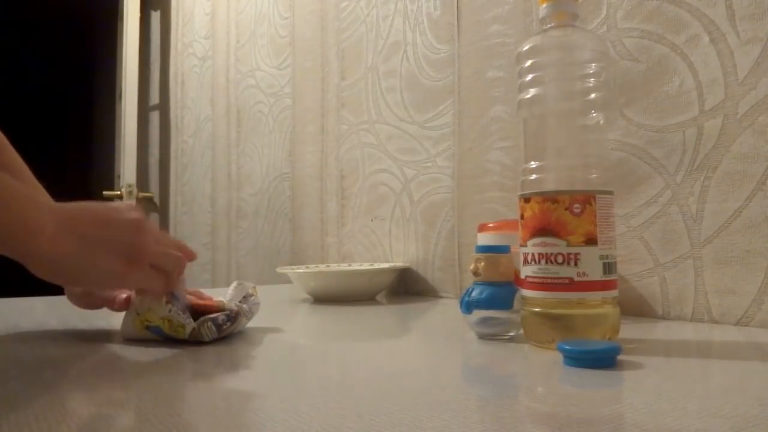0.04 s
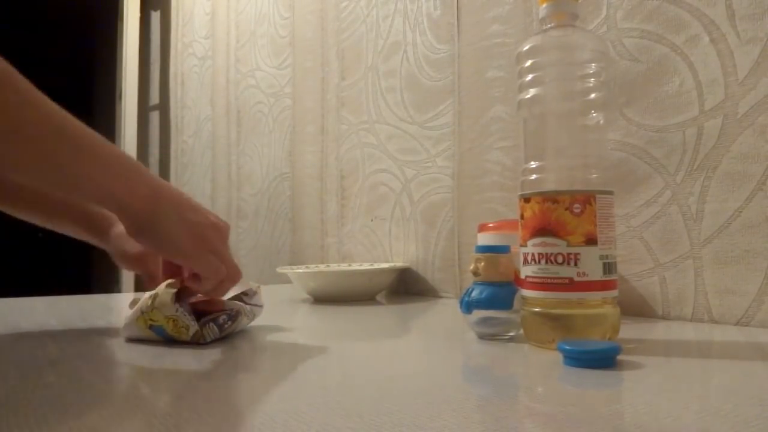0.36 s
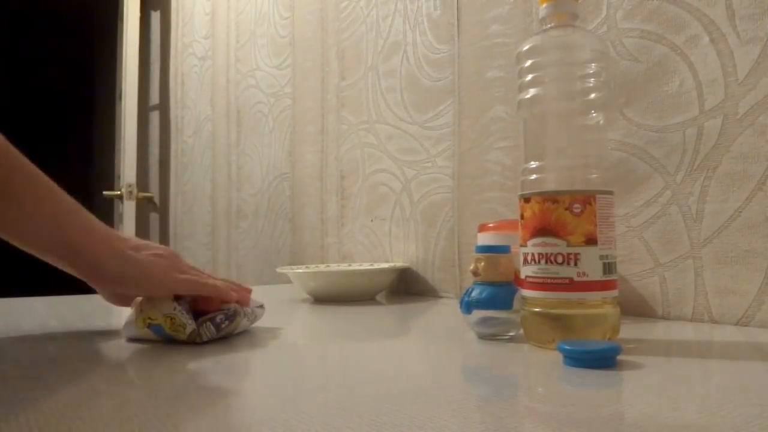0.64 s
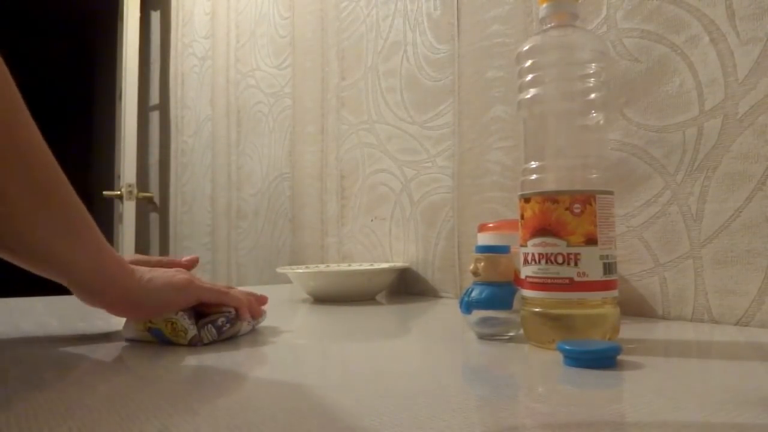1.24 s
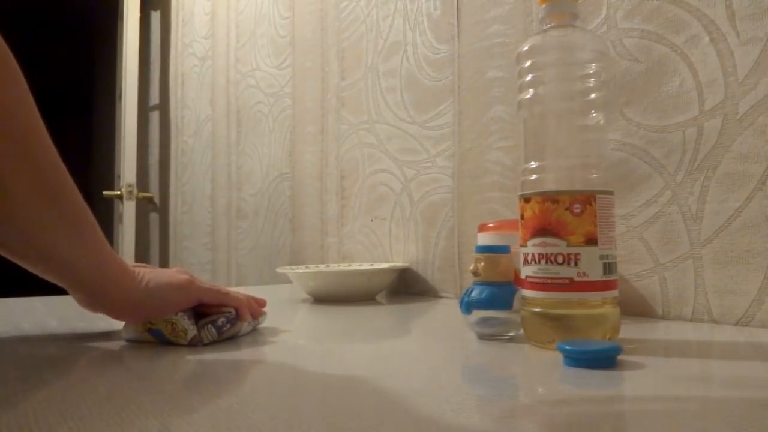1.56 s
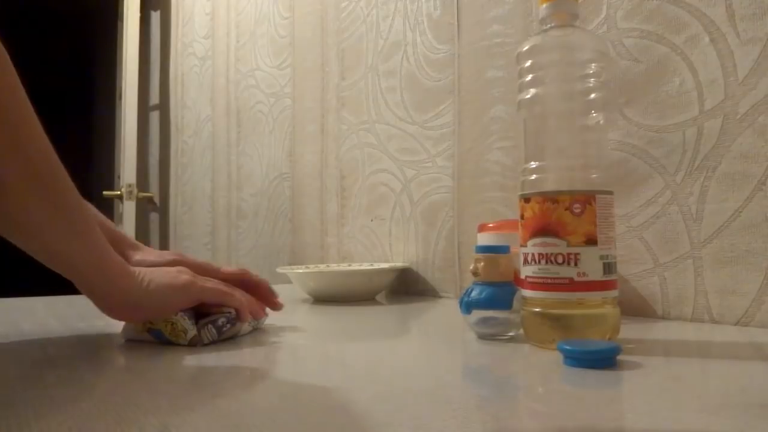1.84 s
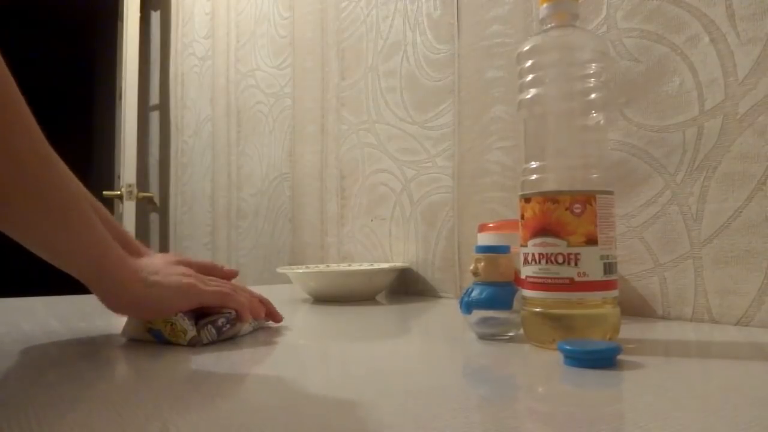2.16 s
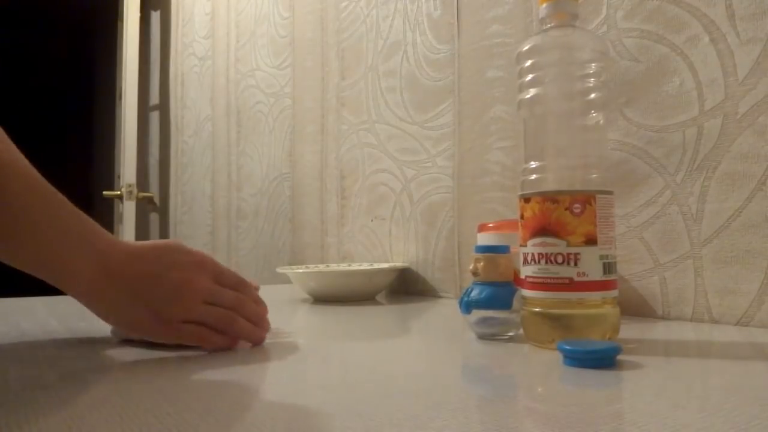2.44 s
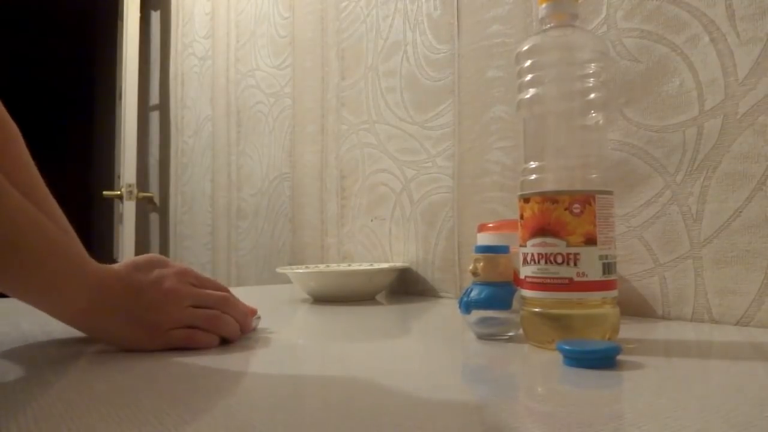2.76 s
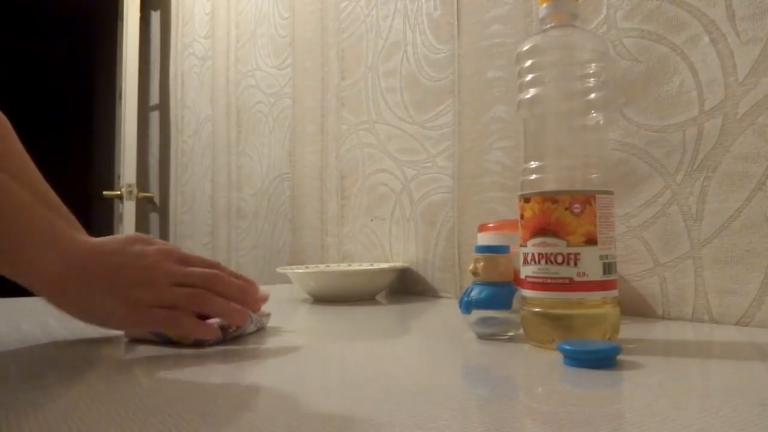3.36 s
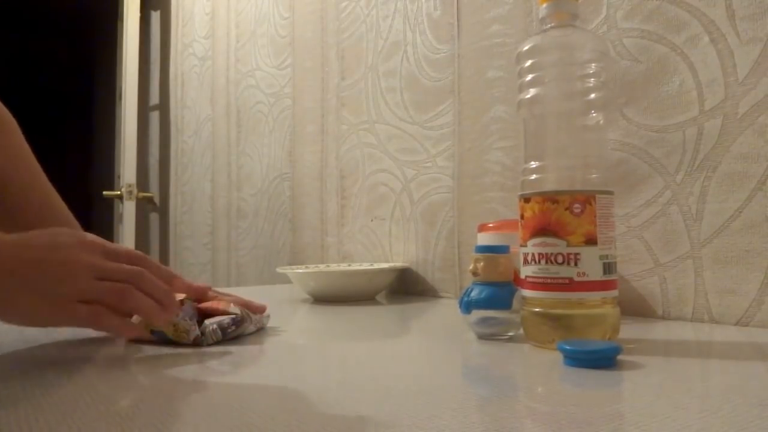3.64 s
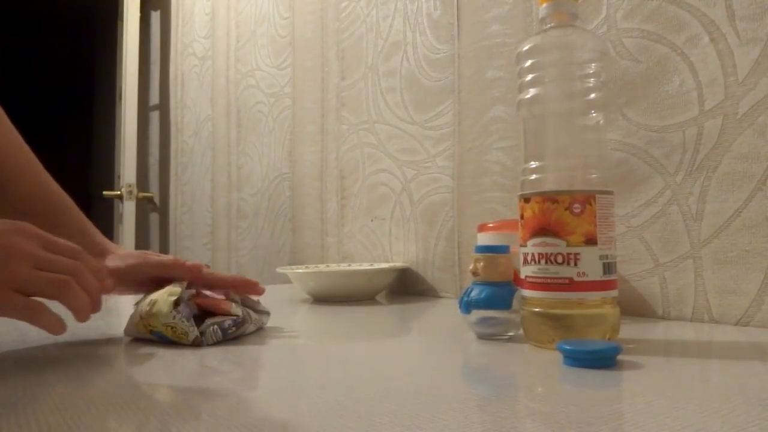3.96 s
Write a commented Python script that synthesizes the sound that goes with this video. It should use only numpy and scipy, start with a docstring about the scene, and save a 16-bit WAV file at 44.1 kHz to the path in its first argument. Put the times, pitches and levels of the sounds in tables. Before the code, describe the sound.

A paper bundle crinkles in a small room, with sharp, bright snaps over a fine rustle. Hands press it down, bumping the table lightly, and the sound turns duller, ending in a soft rub of skin on paper.

```python
"""In a small room, hands fold a stiff paper bundle shut, press it flat on a table and let it go.
Creases buckle with sharp snaps over fine crackle and sliding paper, bright at first, duller near the end.
Low puffs sit under some bright snaps, paper edges skid, hard pushes knock the table, and at last
the palm slides away. The table and wall reflect each snap, and the room rings briefly."""
import sys
import numpy as np
from scipy import signal
from scipy.fft import rfft, irfft
from scipy.io import wavfile
from scipy.ndimage import uniform_filter1d

SR = 44100
rng = np.random.default_rng(int(sys.argv[2]) if len(sys.argv) > 2 else 0)


def master(y):
    """Save y as 16-bit WAV."""
    cut = np.clip(np.atleast_2d(y).T, -1, 1)
    pcm = np.round(cut * 32767)  # scale
    wavfile.write(sys.argv[1], SR, pcm.astype(np.int16))


N = 176400
HZ = np.fft.rfftfreq(4096, 1 / SR)  # the frequencies at which filters are drawn

# how strong the rustle is in three ranges: t/s, low level/dB, middle level/dB, treble level/dB
RUSTLE_LEVELS = [(0, -37.5, -38, -29), (.13, -43, -29.5, -20.5), (.19, -40.5, -40, -29),
                 (0.298, -41.5, -41.5, -28), (0.382, -34.5, -26.5, -22), (.435, -47, -40, -40),
                 (0.485, -57, -31, -26.5), (.61, -36.5, -30, -26), (.74, -46.5, -48.5, -38.5),
                 (0.773, -41.5, -38, -26.5), (0.818, -46, -39.5, -34), (0.879, -39, -33, -25.5),
                 (1.1, -41.5, -28.5, -29), (1.218, -36, -34, -33.5), (1.31, -48, -40, -41.5),
                 (1.39, -34, -34, -34), (1.49, -53, -44, -38), (1.536, -32.5, -30, -36),
                 (1.573, -47, -43, -42), (1.645, -37.5, -36.5, -32.5), (1.82, -42, -39, -36),
                 (1.878, -46.5, -39, -38.5), (2.048, -45, -43.5, -41.5), (2.109, -34.5, -34.5, -39),
                 (2.274, -43.5, -33.5, -28.5), (2.33, -63, -37.5, -37.5), (2.411, -70, -37.5, -31),
                 (2.461, -92, -58, -49), (2.497, -76, -47, -49), (2.514, -55, -32, -27),
                 (2.675, -41.5, -39.5, -36), (2.733, -28.5, -26.5, -28.5), (2.775, -41.5, -49, -40),
                 (2.86, -52.5, -49.5, -44.5), (2.929, -46.5, -43, -35), (2.99, -55, -47, -57),
                 (3.139, -44, -41, -47), (3.195, -47, -28.5, -40.5), (3.325, -44, -41, -41),
                 (3.37, -38, -35, -40), (3.494, -38.5, -40, -48), (3.66, -64.5, -50, -55),
                 (3.75, -51, -45.5, -49), (3.99, -50.5, -41, -50)]
# tone colour of each range: f/Hz, level/dB
LOW_COLOUR = [(30, -36), (230, -20.5), (300, -9.5), (480, -6), (720, 2.5), (1100, 3), (1600, -25.5),
              (4000, -36)]
MIDDLE_COLOUR = [(300, -42), (800, -11), (1150, -1), (1600, -5), (2150, 2), (4000, -10), (16000, -49)]
TREBLE_COLOUR = [(1000, -20.5), (2600, -6), (3500, 0), (4400, 4), (5500, 1.5), (7500, -2.5), (11500, -8.5),
                 (16000, -13.5)]
# texture of each range: crackle rate/(1/s), size spread/dB, amount of sliding, clumping/dB, gain/dB
RUSTLE_TEXTURE = [(818, 3.5, 0.6, 2.5, -3.5), (602, 2.5, 0.98, 3.5, -2), (600, 2.8, 0.9, 3, -3.5)]
# colour of the room's steady noise: f/Hz, level/dB
ROOM_COLOUR = [(120, -16), (2500, -15.5), (16000, -46)]
# reflections from table and wall: left delay/s, right delay/s, gain
REFLECTIONS = [(.00068, 0.00052, 0.1), (.0029, .0033, 0.16)]
# how long the room takes to fade by 60 dB: f/Hz, fade time/s
ROOM_FADE = [(100, 0.15), (270, 0.51), (700, 0.25), (4000, 0.2), (16000, 0.27)]
# creases that buckle: t/s, ring f/Hz, ring level/dB, thud level/dB, crack level/dB
CREASE_SNAPS = [(0.0792, 7800, -29, -38, -20), (0.096, 4400, -7.5, -39, -14), (0.098, 4440, -6.5, -42, -24),
                (0.1489, 4260, -13.5, -21.5, -24), (0.2051, 4960, -12.5, -42, -13),
                (0.3591, 5400, -17.5, -23, -23), (0.4448, 4560, -12.5, -44, -11),
                (0.4822, 5170, -8.5, -28, -13), (0.559, 4200, -12, -28, -20),
                (0.5857, 11900, -14, -36, -17), (0.6786, 11230, -22, -46, -23.5),
                (0.9188, 2750, -15.5, -48, -27), (0.9546, 4870, -11.5, -43, -17),
                (0.9784, 4570, -37, -37, -19.5), (1.0011, 4460, -8.5, -21, -17.5),
                (1.0445, 4600, -9.5, -19.5, -13), (1.113, 2930, -16.5, -21, -24),
                (1.139, 4480, -14, -38, -22), (1.1934, 4240, -12, -21, -23),
                (1.2411, 4980, -7.5, -34, -12.5), (1.2496, 5130, -18, -32, -18.5),
                (1.342, 4160, -16, -23.5, -25.5), (1.3806, 4100, -17, -24, -28.5),
                (1.4392, 4140, -15.5, -23.5, -40), (1.5855, 4140, -13, -21.5, -25.5),
                (1.6338, 1460, -21.5, -28, -24.5), (1.6933, 4160, -12.5, -23, -24),
                (1.737, 2120, -10.5, -20, -19), (1.8033, 5170, -14.5, -29.5, -16.5),
                (1.9021, 4180, -16, -25, -27.5), (1.9637, 3800, -15.5, -25, -27.5),
                (2.0708, 4130, -12.5, -25, -25), (2.0827, 4200, -15.5, -21, -26.5),
                (2.1299, 4240, -16, -25, -41), (2.2781, 4200, -13, -23, -26), (2.4215, 1796, -31, -56, -31),
                (2.6661, 5940, -17.5, -52, -22.5), (2.6932, 4300, -14.5, -19.5, -24),
                (2.7245, 2720, -17, -38, -37), (2.7351, 4060, -15, -22, -35),
                (2.9358, 4600, -22, -32.5, -30.5), (3.0172, 3600, -20.5, -30, -29),
                (3.1795, 2620, -19.5, -25.5, -51), (3.274, 2370, -22.5, -54, -30),
                (3.3424, 2030, -12, -22.5, -43), (3.5081, 2430, -17.5, -29, -31.5)]
# colours of a snap's thud and of its crisp crack: f/Hz, level/dB
THUD_COLOUR = [(200, -29.5), (550, -3.5), (850, 11), (1250, 18), (1900, -28.5), (5000, -32.5)]
CRACK_COLOUR = [(400, -13), (3000, -28), (6000, -1.5), (7800, 14), (10000, 7.5), (11500, 8.5), (16000, -5)]
# low puffs under the brightest snaps: t/s, level/dB
LOW_PUFFS = [(0.091, -52), (.203, -51), (.444, -45), (0.484, -47), (.586, -53), (0.773, -49), (0.979, -46),
             (1.735, -58), (1.803, -49)]
# paper edges that skid: t/s, length/s, f/Hz, level/dB
EDGE_SKIDS = [(.207, 0.052, 4840, -31), (0.446, 0.034, 8460, -28), (1.241, 0.018, 6860, -22.5),
              (1.802, 0.027, 7200, -27), (2.421, 0.017, 1730, -28), (3.277, 0.033, 9000, -46.5),
              (3.51, 0.041, 2350, -31.5)]
# the hardest pushes on the table: t/s, level/dB
HARD_PUSHES = [(1.048, -41.5), (1.634, -41.5), (1.738, -41.5), (2.085, -45), (2.727, -36)]
# colour of the palm's knocking and sliding: f/Hz, level/dB
PALM_COLOUR = [(60, -25), (330, -5.5), (520, 4), (900, -7.5), (3000, -49)]
# skin sliding over the flat bundle: t/s, level/dB
PALM_LEVELS = [(3.04, -59), (3.17, -50), (3.298, -57), (3.36, -41.5), (3.499, -56.5), (3.6, -86)]

USUAL_RING_HZ = 3940  # patches of paper that ring lower than this count as large


def amp(db):
    """Turns decibels into a gain."""
    return 10 ** (np.asarray(db) / 20)


def unit(x):
    """Scales a sound to a total energy of one."""
    return x / np.sqrt(np.sum(x ** 2) + 1e-20)


def even(x):
    """Scales a sound to an average power of one."""
    return unit(x) * np.sqrt(x.size)


def read(points, hz=HZ):
    """Reads between the rows of a table, with frequency spaced like musical pitch."""
    f, value = np.transpose(points)
    return np.interp(np.log(hz + 1), np.log(f + 1), value)


def add(mix, s, sound):
    """Mixes a sound in, starting at s seconds."""
    part = mix[max(round(s * SR), 0):][:len(sound)]
    part += sound[:len(part)]


def fade(t, seconds):
    """A smooth decay that loses 60 dB in the given time."""
    return np.exp(-np.log(1000) * t / seconds)


def colour(x, db):
    """Filters a sound by one gain in dB for each frequency in HZ."""
    log_gain = np.log(amp(np.r_[db, db[-2:0:-1]]))
    response = np.exp(np.conj(signal.hilbert(log_gain)))  # rings after a click, never before
    taps = irfft(response[:len(HZ)])
    return signal.oaconvolve(x, taps[:len(HZ)])[:len(x)]


def flatten(force, width_hz=350):
    """Evens out the lows and highs of a burst, ready to be coloured."""
    power = abs(rfft(force, 2 * len(HZ) - 2)) ** 2
    smoothed = uniform_filter1d(power, int(width_hz / HZ[1]))
    return colour(force, -10 * np.log10(smoothed + 1e-9))


def rustle(clump_s=.008):
    """Paper slides on paper: a smooth hiss and tiny crackles, both coming in clumps."""
    t, out = np.arange(N) / SR, np.zeros(N)
    times, *levels = np.transpose(RUSTLE_LEVELS)
    for level, shape, texture in zip(levels, (LOW_COLOUR, MIDDLE_COLOUR, TREBLE_COLOUR), RUSTLE_TEXTURE):
        per_s, spread_db, sliding, clump_db, gain_db = texture
        sizes = amp(spread_db * np.minimum(rng.exponential(1, N), 4.8)) * rng.choice([-1, 1], N)
        crackles = even(sizes * (rng.random(N) < per_s / SR))
        clumps = even(uniform_filter1d(rng.standard_normal(N), int(clump_s * SR)))
        force = (crackles + sliding * rng.standard_normal(N)) * amp(clump_db * np.minimum(clumps, 2))
        out += even(colour(force, read(shape))) * amp(np.interp(t, times, level) + gain_db)
    return out


def room_tone(level_db=-65.5):
    """The faint, steady noise of the room."""
    mid, side = (even(colour(noise, read(ROOM_COLOUR))) for noise in rng.standard_normal((2, N)))
    return amp(level_db) * np.array([mid + side / 2, mid - side / 2])


def room_boom(hz=276.3, fade_s=0.34):
    """The room's strongest low note, dying away."""
    t = np.arange(SR // 2) / SR
    return np.sin(2 * np.pi * hz * t) * fade(t, fade_s)


def room_tail(alike=0.67, rise_s=0.001):
    """Many echoes blur into fading noise, much alike on the left and right."""
    t = np.arange(SR // 2) / SR
    left, other = rng.standard_normal((2, len(t)))
    right = alike * left + np.sqrt(1 - alike ** 2) * other
    hz, when, spectrum = signal.stft(np.array([left, right]), SR, nperseg=256)
    spectrum = spectrum * fade(when, read(ROOM_FADE, hz)[:, None])
    pair = signal.istft(spectrum, SR, nperseg=256)[1][:, :len(t)]
    rise = 1 - np.exp(-(t / rise_s) ** 2)
    return np.array([unit(side * rise) for side in pair])


def room(x, boom_db=-22, tail_db=-3, tails=4, shift_s=.045):
    """Adds the low boom, near reflections, and tails that take turns as the sounding spot moves."""
    out = np.array([x, x]) + amp(boom_db) * signal.oaconvolve(x, unit(room_boom()))[:N]
    for *delays, gain in REFLECTIONS:
        for side, delay in zip(out, delays):
            add(side, delay, gain * x)
    spot = np.arange(N) / SR / shift_s
    for k in range(tails):
        turn = np.sin(np.pi / 2 * np.minimum((spot - k) % tails, 2))
        out += amp(tail_db) * signal.oaconvolve((x * turn)[None], room_tail(), axes=1)[:, :N]
    return out


def patch_colour(ring_hz):
    """Colour in dB of a flat patch of paper ringing briefly; large ones sound lower and more hollow."""
    ratio = (HZ + 1) / ring_hz
    size = max(USUAL_RING_HZ / ring_hz, 1)
    sharpness = 4.1 * np.sqrt(size)
    peak = 1 / np.hypot(1, sharpness * (ratio - 1 / ratio))
    floor = amp(-13) / size ** 4 * (HZ + 1) ** 2 / (HZ ** 2 + 1100 ** 2)
    treble_cut = 1 + (ratio / 1.54) ** 4
    return 20 * np.log10((peak + floor) / treble_cut)


def snap(ring_hz, ring_db, thud_db, crack_db, slip_s=0.0016, settle_s=0.0052, ticks_per_s=1100):
    """A crease gives way in a quick run of tiny slips, then the paper next to it settles in ticks."""
    t = np.arange(SR // 16) / SR
    slips, signs = np.sign(rng.standard_normal((2, len(t))))
    slipping = flatten(slips * np.exp(-(t / slip_s) ** 2))
    ticks = signs * (rng.random(len(t)) < ticks_per_s / SR)
    stretch = 1 + max(np.log2(USUAL_RING_HZ / ring_hz), 0)  # large patches take longer to settle
    settling = flatten(ticks * np.exp(-t / (settle_s * stretch)))
    neighbour_hz = ring_hz * 2 ** rng.uniform(-.35, .35)
    out = 0
    for force, hz, gain_db in (slipping, ring_hz, -1.5), (settling, neighbour_hz, -7):
        # the patch rings, the bundle thuds, the fold cracks
        parts = [(ring_db, patch_colour(hz)), (thud_db, read(THUD_COLOUR)),
                 (crack_db, read(CRACK_COLOUR))]
        out += amp(gain_db) * sum(amp(db) * unit(colour(force, shape)) for db, shape in parts)
    return np.sqrt(SR / 1000) * out  # levels count as if the energy fell within one millisecond


def creases():
    """The creases buckle one after another as the bundle is folded and pressed."""
    out = np.zeros(N)
    for s, *row in CREASE_SNAPS:
        add(out, s, snap(*row))
    return out


def low_puffs(decay_s=0.0068, top_hz=222):
    """Short, low, dead puffs under the brightest snaps."""
    t, out = np.arange(SR // 8) / SR, np.zeros(N)
    shape = -20 * np.log10(1 + (HZ / top_hz) ** 4)
    for s, db in LOW_PUFFS:
        burst = flatten(rng.standard_normal(len(t)) * np.exp(-t / decay_s))
        add(out, s, amp(db) * np.sqrt(SR * decay_s) * unit(colour(burst, shape)))
    return out


def edge_skids(sharpness=3.6, rise_s=.002):
    """Paper edges rub for a moment, each hissing around its own pitch and easing off."""
    t, out = np.arange(SR // 8) / SR, np.zeros(N)
    for s, length, hz, db in EDGE_SKIDS:
        ratio = (HZ + 1) / hz
        shape = -20 * np.log10(1 + (sharpness * (ratio - 1 / ratio) / 2) ** 2)
        level = np.minimum(t / rise_s, 1) * np.exp(-(t / length) ** 2)
        add(out, s, amp(db) * level * even(colour(rng.standard_normal(len(t)), shape)))
    return out


def table_knocks(wood_hz=(449, 697), wood_fade_s=0.2, knock_s=0.024, table_db=-2.5):
    """The palm bears down: the table top knocks and rings, and sets off the room's low note."""
    out, boom = np.zeros(N), room_boom()
    t = np.arange(len(boom)) / SR
    for s, db in HARD_PUSHES:
        wood = sum(np.sin(2 * np.pi * (hz * t + rng.random())) for hz in wood_hz) * fade(t, wood_fade_s)
        knock = even(colour(rng.standard_normal(len(t)), read(PALM_COLOUR))) * np.exp(-t / knock_s)
        add(out, s, amp(db) * (boom + amp(table_db) * (knock + wood)))
    return out


def dull_ending(x, start_s=3.04, blend_s=.045, top_hz=9850):
    """The top treble drops away quickly at about three seconds."""
    blend = np.clip((np.arange(N) / SR - start_s) / blend_s, 0, 1)
    muffled = colour(x, -10 * np.log10(1 + (HZ / top_hz) ** 8))
    return (1 - blend) * x + blend * muffled


def palm_slide():
    """Skin rubs dully on paper as the hand draws back."""
    db = np.interp(np.arange(N) / SR, *np.transpose(PALM_LEVELS), left=-np.inf, right=-np.inf)
    return amp(db) * even(colour(rng.standard_normal(N), read(PALM_COLOUR)))


def scene(right_louder_db=1.34):
    """Paper, hands and table sound in the room, a little to the right."""
    paper = dull_ending(creases() + rustle()) + edge_skids() + palm_slide()
    balance = amp(np.array([[-right_louder_db], [right_louder_db]]) / 2)
    return (room(paper) + table_knocks() + low_puffs()) * balance + room_tone()


def record(dry, top_hz=15900):
    """Clips peaks at full scale and cuts the very highest treble."""
    lowpass = signal.firwin(401, top_hz, window=("kaiser", 8), fs=SR)
    return signal.oaconvolve(np.clip(dry, -1, 1), lowpass[None], "same")


dry = scene()
out = record(dry)
master(out)
```